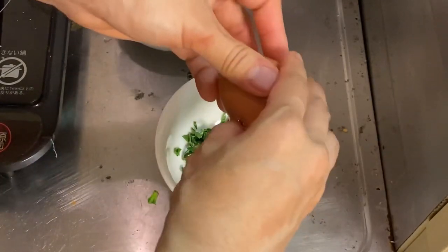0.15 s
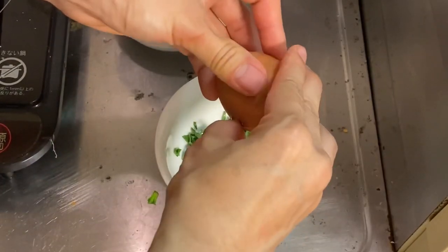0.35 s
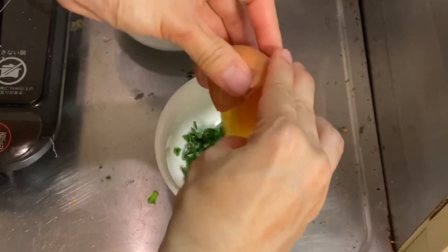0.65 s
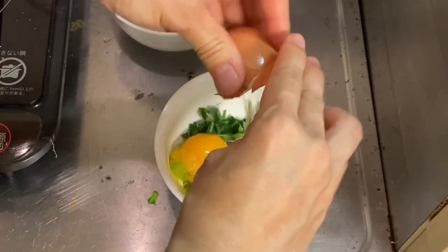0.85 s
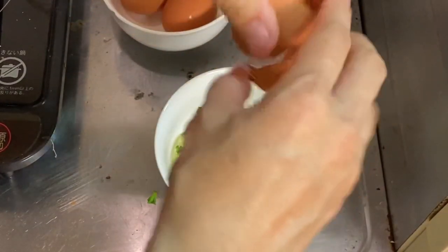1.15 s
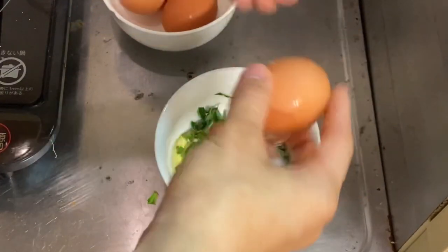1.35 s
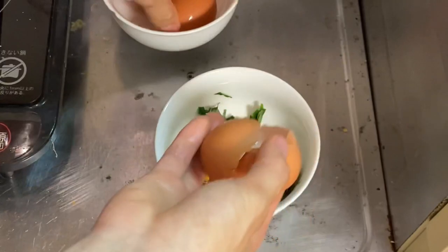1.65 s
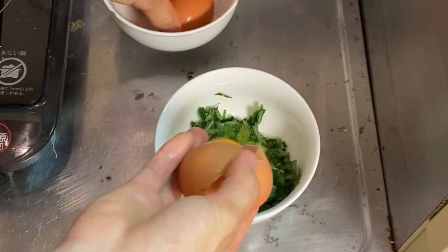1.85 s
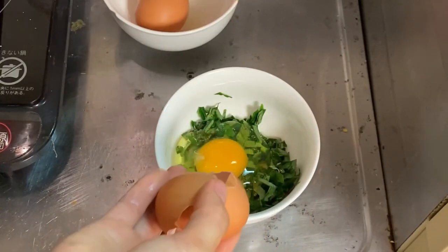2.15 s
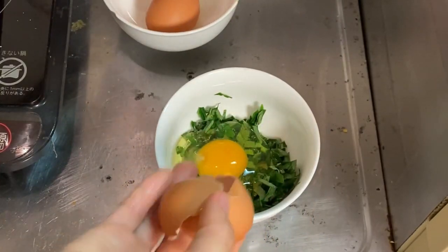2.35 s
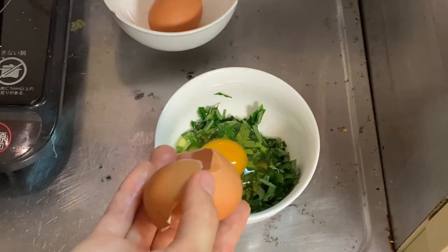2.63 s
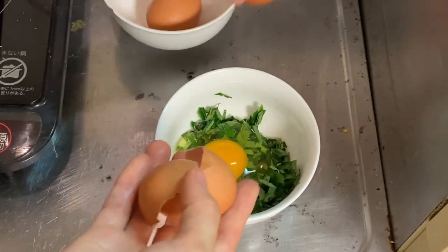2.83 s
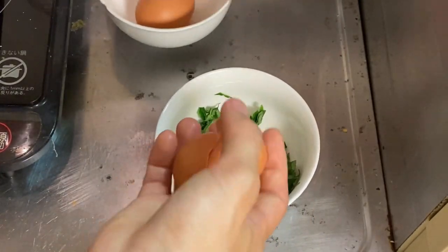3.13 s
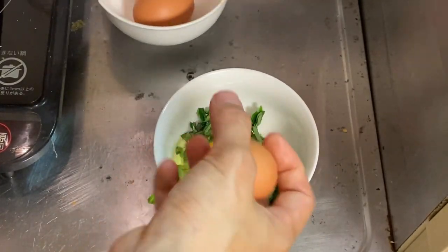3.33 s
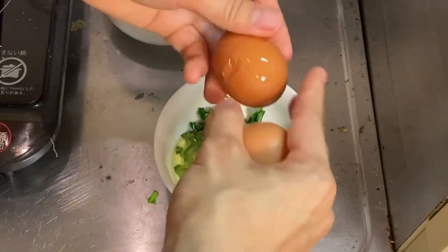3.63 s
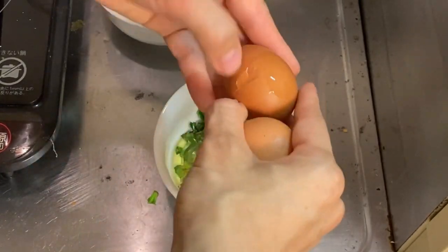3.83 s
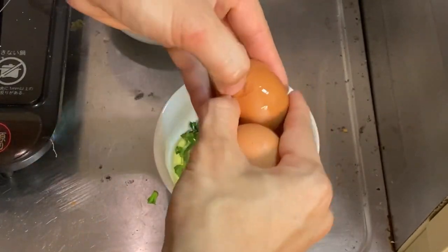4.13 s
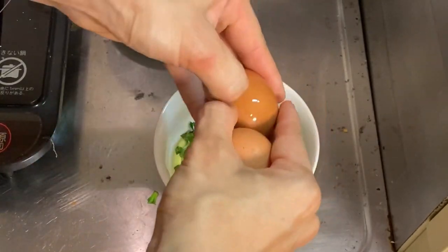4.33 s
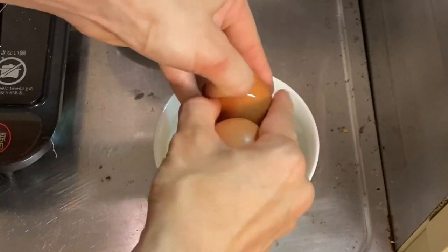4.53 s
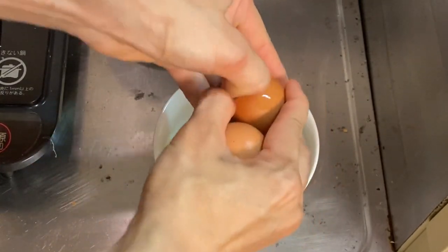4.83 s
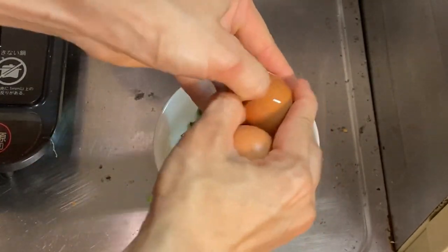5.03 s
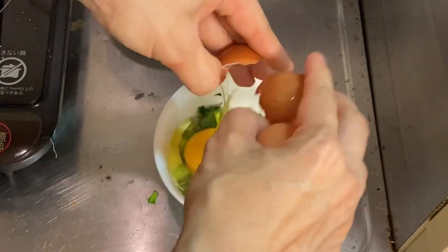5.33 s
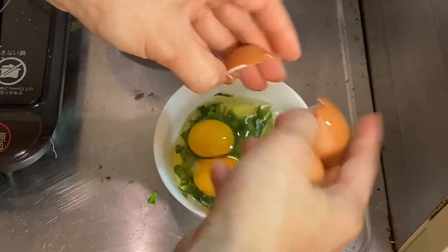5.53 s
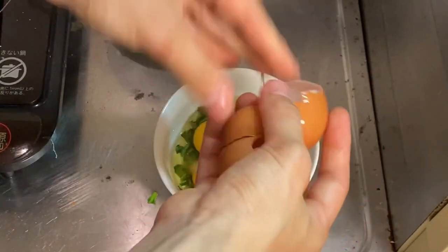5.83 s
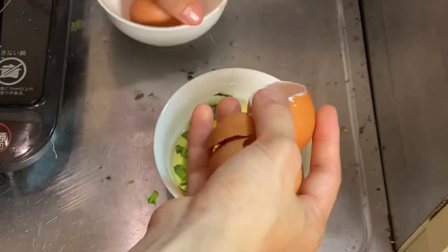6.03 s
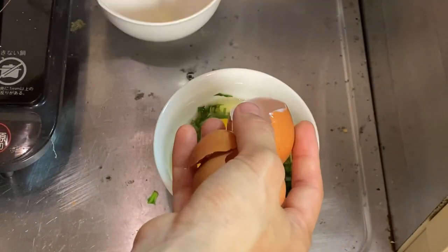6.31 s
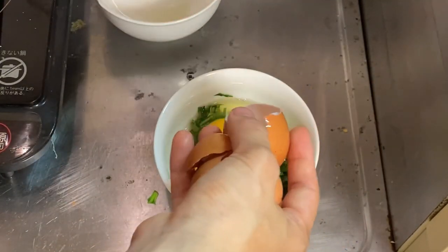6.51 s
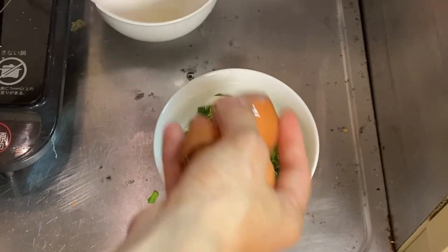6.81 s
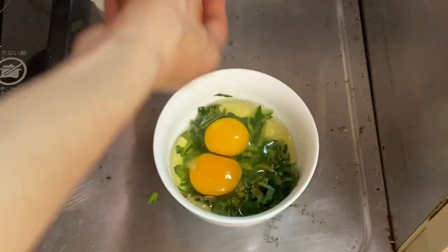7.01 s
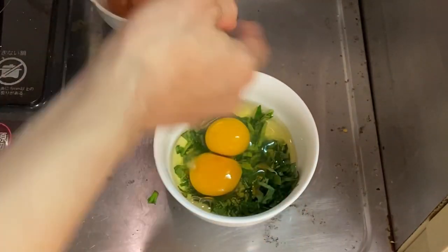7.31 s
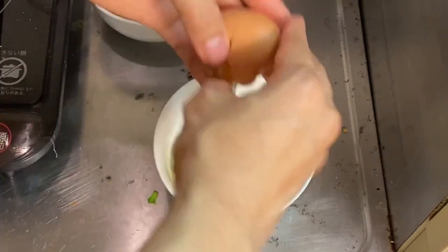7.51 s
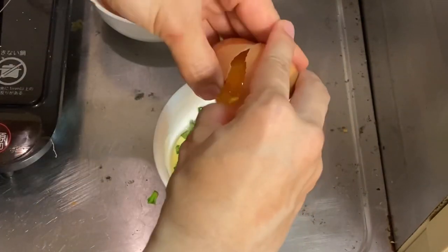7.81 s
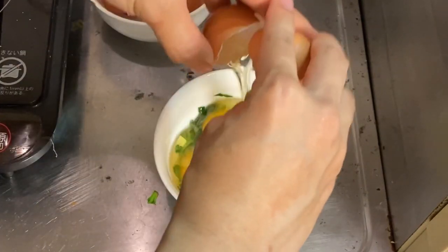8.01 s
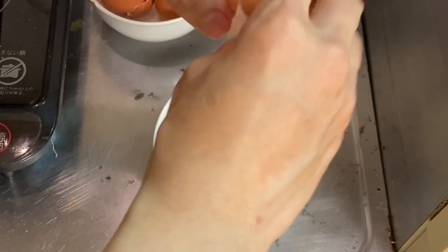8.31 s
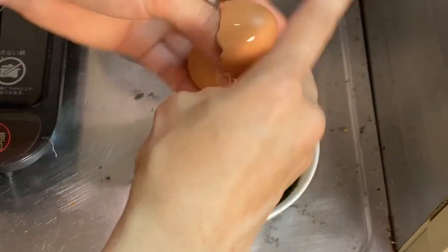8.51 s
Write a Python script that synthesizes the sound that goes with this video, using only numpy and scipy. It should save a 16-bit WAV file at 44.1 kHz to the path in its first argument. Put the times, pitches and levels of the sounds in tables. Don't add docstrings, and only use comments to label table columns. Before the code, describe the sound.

Eggs being broken by hand in a small hard-walled kitchen, heard close on a phone-like stereo pair. First comes a bright snap and shell grinding, then a burst of deep metallic counter knocks with rattling dishes. Sparse dry shell ticks and pops follow, then two shorter bursts of knocking and a loud crisp crack with ceramic clinks. A soft low fan hum runs throughout, with a short room tail.

```python
import sys
import numpy as np
from scipy import signal
from scipy.fft import rfft, irfft, next_fast_len
from scipy.io import wavfile
from scipy.ndimage import uniform_filter1d

SR = 44100
rng = np.random.default_rng(int(sys.argv[2]) if len(sys.argv) > 2 else 0)


def file_out(sig):
    cols = np.atleast_2d(sig).T
    lim = np.clip(cols, -1, 1)
    pcm = np.round(lim * 32767).astype(np.int16)
    wavfile.write(sys.argv[1], SR, pcm)


def volts(x):
    e = np.asarray(x, float) / 20
    return 10 ** e


N = 381906

# frequency in Hz, level in dB per Hz.
FAN_AIR = [(30, -67), (52, -46.5), (110, -55), (210, -53.5), (280, -61.5), (600, -68), (900, -63.5),
           (1000, -73.5), (1500, -68.5), (2700, -70), (3500, -74.5), (6000, -81), (8500, -87.5),
           (13200, -96), (15700, -104)]
# frequency in Hz, width in Hz, rms level in dB.
DUCT_HUM = [(89.8, 3.9, -39), (141.6, 8.2, -38.5), (184.3, 6.3, -43.5), (340.8, 10.6, -55),
            (393.8, 12.3, -49), (491, 7.6, -57.5), (519.5, 16.3, -53), (668, 11, -60.5),
            (749.6, 7.7, -55.5), (1262, 40, -59.5), (1550, 47, -57.5), (2126, 20, -61), (2630, 31, -59)]
# start in seconds, length in seconds,
# rms level in dB, lowest resonance in Hz.
GRINDS = [(.562, .004, -43, 2600), (.604, .045, -37, 3300), (.65, .05, -42, 3900), (1.205, .022, -41, 4400),
          (1.208, .012, -44, 2100), (1.426, .016, -43, 4800), (1.445, .006, -44, 2600),
          (4.495, .012, -46, 3400), (5.045, .035, -43, 3700), (5.705, .016, -48, 2900),
          (5.721, .024, -37, 3900), (5.772, .006, -49, 8000), (7.243, .015, -30, 2900),
          (7.265, .022, -35, 2600), (7.293, .04, -38, 2400)]
# multiple of the lowest, level in dB.
SHARD_MODES = [(1, 0), (1.48, -2), (2.05, -4)]
# start in seconds, peak in dB, fragment pitch in Hz,
# hollow pitch in Hz, hollow level in dB.
STRIKES = [(2.754, -22, 6340, 1270, 8.5), (2.8278, -26, 3570, 900, 7.5), (2.8534, -34, 3450, 3010, 0),
           (2.9642, -8, 6560, 2300, 3), (3.0188, -28, 6700, 2130, 3), (3.054, -25.5, 5120, 2420, 3),
           (3.1806, -13, 7600, 2190, -1), (3.272, -34, 5990, 900, 3), (3.29, -26.5, 5300, 2050, 3),
           (6.1492, -23, 8500, 2400, 6), (6.2376, -34, 4820, 885, 7), (6.5527, -20, 7600, 1950, -3),
           (6.5588, -13, 6460, 2580, -10)]
# start in seconds, peak in dB, fragment pitch in Hz,
# after-crackle in dB.
SNAPS = [(0.5812, -9, 5800, -17), (.5882, -5, 5200, -23), (0.6233, -25, 3280, -5), (.6325, -19, 9600, -7.5),
         (.6359, -28, 4400, -8), (1.168, -28, 3700, -18), (1.2, -40, 4000, -10), (1.2222, -27, 4470, -19),
         (1.4305, -26, 10420, -16), (1.6246, -30, 9100, -18), (1.7077, -36.5, 9700, -18),
         (4.2163, -22.5, 3830, -23), (4.4906, -17.5, 10300, -21), (4.8355, -20, 9400, -19),
         (4.8468, -25, 7110, -18), (4.8577, -18.5, 8350, -23), (5.0675, -31.5, 6850, -13),
         (5.6718, -24, 9000, -24), (5.717, -34, 4900, -10), (5.724, -28, 4040, -14),
         (5.739, -32, 7840, -14), (7.089, -26, 5200, -17), (7.1931, -12.5, 6420, -25),
         (7.217, -34, 6420, -8), (7.2246, -16, 10080, -21), (7.2393, -4.5, 5600, -24),
         (7.2631, -14, 3520, -14), (7.325, -30.5, 3640, -7), (7.8511, -28.5, 10200, -10),
         (7.8854, -24, 5900, -15)]
# start in seconds, peak in dB, fragment pitch in Hz,
# hollow pitch in Hz, after-crackle in dB.
POPS = [(.5665, -23, 4600, 2600, -20), (.5815, -20, 5800, 1650, -18), (.6001, -21, 5730, 1970, -26),
        (.6625, -30, 4200, 1810, -8), (.6876, -28.5, 9860, 1810, -16), (.947, -34.5, 9910, 2110, -16),
        (1.2125, -33, 7300, 2000, -12), (1.387, -34, 3960, 2020, -19), (1.403, -33, 6370, 2150, -11),
        (1.4664, -25.5, 10100, 2800, -25), (4.24, -31, 6120, 2600, -28), (4.4606, -34, 4870, 1680, -12),
        (4.5474, -34, 3800, 1420, -10), (4.731, -31, 4310, 1420, -20), (5.0406, -26, 7000, 2500, -20),
        (5.08, -28, 10470, 2620, -28), (5.1487, -27, 9000, 2750, -24), (5.7911, -31, 6890, 1980, -13.5),
        (6.0016, -33.5, 6900, 2150, -15), (7.1688, -22, 7500, 1900, -6), (7.2412, -12, 4700, 2900, -38),
        (7.2745, -17, 3900, 2600, -16), (7.7685, -31.5, 6850, 2670, -16), (7.8585, -26, 5600, 2750, -20)]
# start in seconds, length in seconds, peak in dB,
# fragment pitch in Hz.
RUSTLES = [(.715, .02, -40, 7100), (1.06, .01, -41, 7600), (1.145, .045, -39, 4000),
           (1.426, .03, -41, 10300), (4.141, .02, -42, 3700), (4.62, .01, -41.5, 4400),
           (4.7, .02, -37, 4400), (4.82, .01, -46, 3300), (5.049, .06, -38.5, 8000),
           (5.316, .01, -47, 6500), (5.676, .015, -43, 6000), (6.06, .025, -40.5, 3900),
           (6.141, .01, -43, 6500), (7.055, .02, -38, 3700), (7.136, .01, -46, 6400),
           (7.375, .015, -36.5, 4500), (7.519, .01, -44, 5900), (7.732, .02, -43, 7000),
           (7.779, .018, -40, 6300), (7.86, .01, -43, 7800), (8.47, .012, -38.5, 3600)]
# start in seconds, pitch in Hz, level in dB, t60 in
# seconds.
NOTES = [(.606, 5200, -41, .08), (.635, 1760, -31, .05), (.6635, 1820, -30, .04), (.567, 1300, -32, .012),
         (.5885, 4000, -18, .02), (.593, 1750, -28, .04), (.612, 5000, -36, .05), (.64, 6600, -36, .03),
         (0.686, 1850, -38, 0.03), (.694, 1800, -38, .05), (2.756, 624, -15.5, 0.16),
         (2.758, 397, -21, 0.091), (6.158, 620, -21, 0.12), (6.163, 360, -19, .2), (6.25, 150, -21, .6),
         (6.555, 790, -23, 0.031), (7.194, 3600, -33, 0.11), (7.31, 3620, -35.5, 0.25),
         (2.9645, 2900, -33, 0.022), (2.965, 1450, -19, .03), (5.148, 7500, -40, 0.032),
         (6.557, 1450, -31, 0.12), (5.6775, 1570, -31, .025), (7.1692, 1750, -20, .06),
         (1.222, 4500, -38, .04), (7.169, 970, -24, 0.043), (7.182, 1140, -27, 0.057),
         (7.2405, 2700, -20, 0.05), (7.247, 5500, -31, 0.064), (7.2767, 1643, -17, 0.035),
         (7.2743, 3900, -22, .012), (7.284, 1640, -29, .14), (7.313, 1600, -31, .03),
         (7.2472, 6100, -24, .012), (7.2632, 7600, -25, .012), (7.309, 2450, -32, .02),
         (.589, 1850, -24, .03), (.601, 2000, -30, .02), (1.229, 2200, -41, .03), (1.1685, 3100, -40, .015),
         (1.432, 2100, -40, .04), (5.0412, 2300, -27, .02), (6.553, 3700, -26, .035),
         (6.5525, 12500, -34, .01), (6.148, 13000, -30, .02), (7.29, 2350, -33, 0.2),
         (7.885, 7900, -42, .15)]
# start in seconds, pitch in Hz, level in dB.
SHORT_NOTES = [(.5665, 3000, -31), (.5813, 2800, -25), (.5815, 3900, -22), (.582, 1250, -22),
               (.5885, 4300, -18), (1.4665, 5600, -39), (1.6248, 5600, -41), (1.212, 8000, -36),
               (2.9645, 15300, -24), (3.181, 15300, -27), (3.181, 4200, -26), (4.2165, 3800, -34),
               (4.2405, 7600, -42), (4.491, 3900, -29), (4.491, 2800, -33), (4.732, 4200, -33),
               (4.836, 4000, -31), (4.858, 4000, -34), (5.041, 3600, -36), (5.041, 15300, -40),
               (5.1485, 15300, -37), (5.149, 7500, -31), (5.149, 11800, -33), (5.672, 2800, -38),
               (5.672, 5600, -38), (5.7245, 1900, -33), (5.727, 1250, -34), (6.1495, 1200, -23),
               (6.15, 2700, -22), (6.15, 5600, -27), (6.553, 15300, -26), (6.5535, 5500, -26),
               (6.5535, 8000, -25), (6.554, 2800, -28), (7.0895, 3500, -31), (7.0895, 1800, -34),
               (7.169, 15300, -30), (7.169, 5600, -29), (7.1695, 12000, -30), (7.2248, 8300, -25),
               (7.225, 5600, -29), (7.225, 3700, -32), (7.2635, 2000, -25), (7.266, 2800, -24),
               (7.2745, 1300, -22), (7.275, 5600, -25), (7.248, 8000, -27)]
# start in seconds, boom in dB, rattle in dB,
# boom t60 in seconds, rattle t60 in seconds.
KNOCKS = [(2.753, -14, -12, 0.51, 0.24), (2.827, -16, -22, 0.33, 0.24), (2.854, -11.5, -25.5, 0.24, 0.21),
          (2.965, -9, -17.5, 0.65, 0.35), (3.056, -17, -26.5, 0.18, 0.099), (3.182, -4.5, -22.5, 0.24, 0.5),
          (3.255, -7.5, -30.5, 0.24, 0.38), (3.29, -23, -31, 0.41, 0.34), (3.355, -21, -30, 0.36, 0.077),
          (6.009, -23.5, -53, 1, .3), (6.152, -13, -18, 0.24, 0.29), (6.171, -10.5, -35, 0.25, 0.15),
          (6.244, -21, -29.5, 0.63, 0.073), (6.553, -26, -20.5, 0.092, 0.1), (6.564, -10.5, -28, 0.3, 0.3),
          (6.61, -22.5, -33.5, 0.25, 0.25), (7.168, -27, -34, 0.3, 0.29), (7.239, -22, -48, 0.66, 0.43)]
# frequency in Hz, level in dB.
SHEET_MODES = [(56, -4), (70, -3.5), (92, -13), (139, 1.5), (152, 3.5), (186, 2.5), (232, -4.5), (290, -19),
               (330, -5), (410, -15), (480, -20), (560, -17), (640, -14), (840, -20)]
# frequency in Hz, level in dB per Hz.
CROCKERY = [(30, -33), (55, -7), (105, -9.5), (185, -5), (255, -14.5), (610, -18), (930, -26), (2000, -30),
            (5300, -40), (8700, -46.5), (12300, -48.5), (15700, -47)]
# frequency in Hz, level in dB per Hz.
COUNTER_THUD = [(40, -30), (85, -4), (150, 5), (300, -9.5), (650, -16.5), (1000, -28), (2000, -57)]
# start in seconds, level in dB.
CLACKS = [
    (2.753, -27),
    (2.827, -35),
    (2.965, -14.5),
    (3.182, -30),
    (6.5595, -22),
    (6.566, -31),
]
# frequency in Hz, level in dB, t60 in seconds.
HELD_BOWL_MODES = [(2170, -4, 0.0067), (3600, 0.5, 0.04), (3840, -1, .02), (6530, 3.5, 0.026),
                   (7900, -1, 0.014)]
# start in seconds, level in dB,
# extra level of the low modes in dB.
CLINKS = [
    (6.559, -25, -5),
    (6.592, -44, 4),
    (7.141, -48, -8),
    (7.193, -22, -6),
    (7.247, -33, 6),
    (7.3, -54, 22),
    (6.621, -40, 5),
]
# frequency in Hz, level in dB, t60 in seconds.
BOWL_MODES = [(1480, -23, 0.28), (3660, -11, 0.091), (3760, -16, 0.42), (5260, -16, .12),
              (6380, 8.5, 0.045), (6460, -12, .25), (8172, -26, .12)]
# frequency in Hz, unrelated share in dB, half turns each channel is shifted, in
STEREO = [(60, -25, 0), (200, -20, 0), (380, -13, -.02), (700, -5, -.03), (1300, -1, -.05),
          (1800, -5, -.06), (2250, -19, -.02), (2700, -23, 0), (8150, -18, 0), (9000, -10, .27),
          (10000, -26, .5), (11200, -10, .78), (12300, -14, 1.0), (13400, -9, 1.25), (14500, -26, 1.5),
          (16900, -8, 1.85)]

HOLLOW_HZ, HOLLOW_SPREAD = 1835, .15
SHEET_LATE_S = .003


def shape(x, gain):
    n = next_fast_len(x.shape[-1], True)
    hz = np.maximum(np.fft.rfftfreq(n, 1 / SR), 1)
    return irfft(rfft(x, n) * gain(hz), n)[..., :x.shape[-1]]


def colour(x, table):
    t = np.array(table)
    return shape(x, lambda hz: volts(np.interp(np.log(hz), np.log(t[:, 0]), t[:, 1])))


def unit(x):
    return x / np.sqrt(np.mean(x ** 2))


def band(x, hz, width_hz):
    return signal.lfilter(*signal.iirpeak(min(hz, .45 * SR), hz / width_hz, SR), x)


def fade(t, t60, rise):
    return (1 - np.exp(-t / rise)) * 10 ** (-3 * t / max(t60, .002))


def ring(t, hz, t60):
    return np.sin(2 * np.pi * hz * t) * fade(t, t60, 0.00034)


def add(out, s, x):
    i = int(s * SR)
    out[i:i + len(x)] += x[:N - i]


def walk(rate):
    k = int(SR / rate)
    steps = np.repeat(rng.standard_normal(N // k + 1), k)
    return unit(uniform_filter1d(uniform_filter1d(steps, k), k)[:N])


def fan():
    out = volts(-40.5 + .5 * walk(2.05)) * unit(colour(rng.standard_normal(N), FAN_AIR))
    for hz, width_hz, db in DUCT_HUM:
        out += volts(db + 1.43 * walk(6)) * unit(band(rng.standard_normal(N), hz, width_hz))
    return out


def grinds():
    out, t = np.zeros(N), np.arange(SR // 10) / SR
    grains_per_s, scatter_db, edge_width = 3200, 2.5, .12
    for s, length, db, lowest_hz in GRINDS:
        odds, size, sign = rng.random((3, len(t)))
        grains = (odds < grains_per_s / SR) * volts(-scatter_db * np.log(1 - size)) * np.sign(sign - .5)
        pressure = np.clip(t / .002, 0, 1) * np.clip((length + .006 - t) / .006, 0, 1)
        rub = pressure * grains / np.std(grains)
        shards = volts(-19) * band(rub, 9000., 12000.)
        for multiple, mode_db in SHARD_MODES:
            hz = multiple * lowest_hz
            shards += volts(mode_db) * band(rub, hz, edge_width * hz)
        add(out, s, volts(db + 8) * shards)
    return out


def breaks():
    rows, ticks = [], 3
    for s, db, hz, low_hz, low_db in STRIKES:
        rows.append((s, db, hz, low_hz, low_db, -9.5 - max(db + 23.5, 0)))
    for s, db, hz, crumble_db in SNAPS:
        low_hz = HOLLOW_HZ * np.exp(HOLLOW_SPREAD * rng.standard_normal())
        rows.append((s, db, hz, low_hz, -16, crumble_db))
    for s, db, hz, low_hz, crumble_db in POPS:
        rows.append((s, db, hz, low_hz, 2, crumble_db))
    pieces = rng.standard_normal((len(RUSTLES), ticks, 3))
    delays = rng.random((len(RUSTLES), ticks))
    for (s, length, db, hz), piece, delay in zip(RUSTLES, pieces, delays):
        for k, (a, b, c) in enumerate(piece):
            when = s + length * (k + delay[k]) / ticks
            low_hz = HOLLOW_HZ * np.exp(HOLLOW_SPREAD * c)
            rows.append((when, db + 2.5 * a, hz * np.exp(.17 * b), low_hz, -4, -11.5))
    return rows


def cracks():
    out, t = np.zeros(N), np.arange(SR // 6) / SR
    start = slice(SR // 200)
    for s, peak_db, piece_hz, hollow_hz, hollow_db, crumble_db in breaks():
        noise, odds = rng.standard_normal((2, len(t)))
        sparks = (odds > 2.2) * volts(5.2 * (odds - 4.5))
        fractures = signal.lfilter([1], [1, -.97], sparks) + 0.45
        crumble = volts(min(crumble_db, -3) + 1) * unit(fractures) * fade(t, .17, 0.0028)
        drag = 0.68 * fade(t, 0.046 * volts(0.38 * crumble_db), 0.0001)
        burst = noise * (fade(t, 0.0035, .0001) + drag + crumble)
        burst = burst + volts(15) * (t == t[2])

        snap = band(band(burst, piece_hz, 1.2 * piece_hz), piece_hz, 1.6 * piece_hz)
        snap = snap + volts(-5.5) * band(burst, 15700., 18000.) + volts(-21) * band(burst, 3400., 2500.)
        snap = snap + volts(2) * band(burst, piece_hz, .12 * piece_hz)
        snap = snap - .7 * band(snap, .3 * piece_hz, .4 * piece_hz)

        hollow = band(band(burst, hollow_hz, 1.2 * hollow_hz), hollow_hz, 0.8 * hollow_hz)
        hollow = hollow + volts(11) * band(burst, hollow_hz, 0.12 * hollow_hz)
        hollow *= volts(hollow_db) * np.std(snap[start]) / np.std(hollow[start])
        add(out, s, volts(peak_db - 6) * (snap + hollow) / np.std(snap[:50]))
    return out


def single_notes():
    out, t = np.zeros(N), np.arange(SR // 2) / SR
    short_notes = [(s, hz, db, .014) for s, hz, db in SHORT_NOTES]
    for s, hz, db, t60 in NOTES + short_notes:
        add(out, s, volts(db) * (ring(t, hz, t60) + .6 * ring(t, 1.06 * hz, .6 * t60)))
    return out


def worktop():
    out, t = np.zeros(N), np.arange(SR // 2) / SR
    for s, boom_db, _, boom_t60, _ in KNOCKS:
        boom = np.zeros(len(t))
        for hz, db in SHEET_MODES:
            a, b = rng.standard_normal(2)
            tone = np.sin(2 * np.pi * hz * (1 + 0.0288 * b) * t)
            t60, rise = 0.95 * boom_t60 * (140 / hz) ** 0.2, 0.0055 * (140 / hz) ** .55
            boom += volts(db + 1.86 * a) * tone * fade(t, t60, rise)
        add(out, s + SHEET_LATE_S, volts(boom_db - 9.5) * boom)
    return out


def crockery():
    shake, t = np.zeros(N), np.arange(SR // 2) / SR
    for s, _, rattle_db, _, rattle_t60 in KNOCKS:
        add(shake, s, volts(rattle_db) * fade(t, rattle_t60, 0.0029))
    chatter = rng.standard_normal(N) * volts(walk(150))
    return volts(7) * shake * unit(colour(chatter, CROCKERY))


def counter():
    thud, t = np.zeros(N), np.arange(SR // 2) / SR
    for s, boom_db, _, boom_t60, _ in KNOCKS:
        add(thud, s + SHEET_LATE_S, volts(boom_db - 13.5) * fade(t, boom_t60, 0.006))
    return thud * unit(colour(rng.standard_normal(N), COUNTER_THUD))


def bowl():
    out, t = np.zeros(N), np.arange(SR // 2) / SR
    for s, clack_db in CLACKS:
        for hz, db, t60 in HELD_BOWL_MODES:
            add(out, s, volts(clack_db + db) * ring(t, hz, t60))
    for s, strike_db, low_db in CLINKS:
        for hz, db, t60 in BOWL_MODES:
            add(out, s, volts(strike_db + db + low_db * (hz < 4000)) * ring(t, hz, t60))
    return out


def room(x):
    t = np.arange(SR // 3) / SR
    tail = rng.standard_normal(len(t)) * fade(t, 0.5, 0.0023)
    tail = colour(tail, [(100, 7), (2000, 2), (14000, -5)])
    return x + volts(-14.5) * signal.oaconvolve(x, tail / np.sqrt(np.sum(tail ** 2)))[:N]


def scattered(sound):
    t, side = np.arange(SR // 16) / SR, np.zeros(N)
    for path in rng.standard_normal((4, len(t))) * fade(t, 0.034, 0.0028):
        side += walk(13) * signal.oaconvolve(sound, path / np.sqrt(4 * np.sum(path ** 2)))[:N]
    return colour(side, STEREO)


def scene():
    close = worktop() + crockery() + counter() + bowl() + single_notes() + cracks() + grinds()
    sound = room(close) + fan()
    side, stereo = scattered(sound), np.array(STEREO)

    def channel(ear):
        def turn(hz):
            return np.exp(ear * 1j * np.pi * np.interp(hz, stereo[:, 0], stereo[:, 2]))
        return shape(sound - ear * side, turn)

    return np.array([channel(-1), channel(1)])


def band_limit(x):
    return signal.sosfilt(signal.butter(12, 16800, fs=SR, output="sos"), x)


def record(dry):
    rounded = np.tanh(0.79 * dry) / 0.81
    mix = colour(rounded, [(25, -16), (42, -5), (55, 0), (15690, 0), (15900, -15), (16700, -27),
                           (17150, -45), (17250, -90)])
    return band_limit(mix)


dry = scene()
out = record(dry)
file_out(out)
```